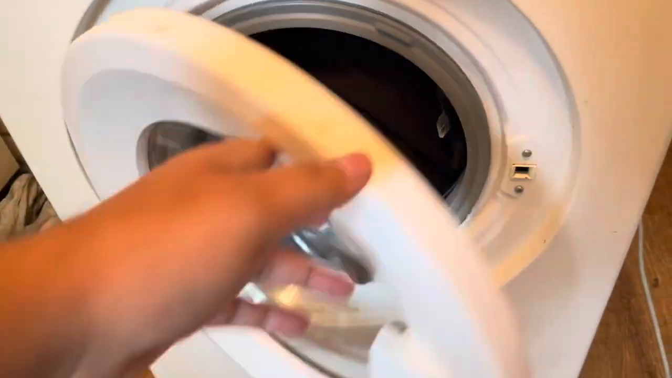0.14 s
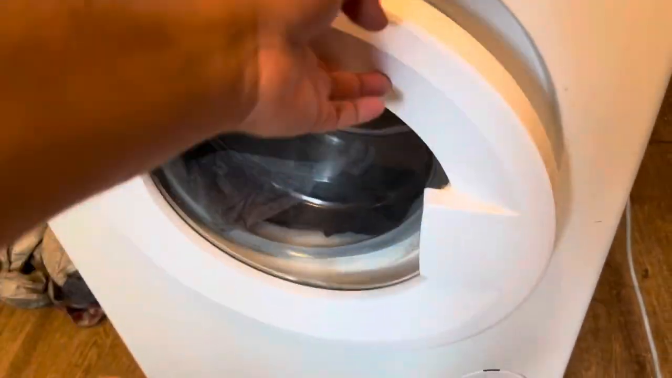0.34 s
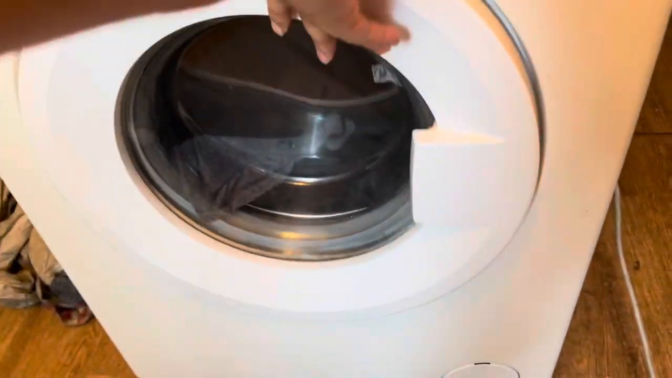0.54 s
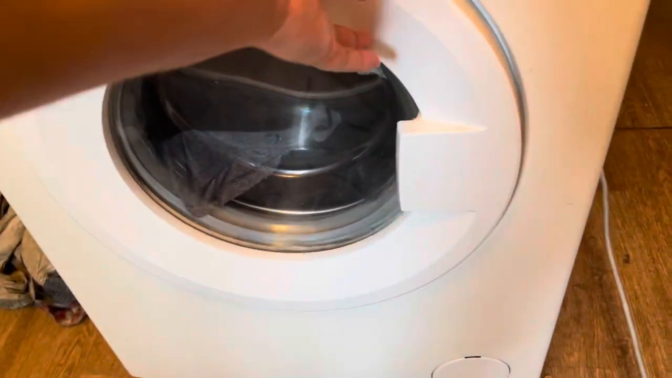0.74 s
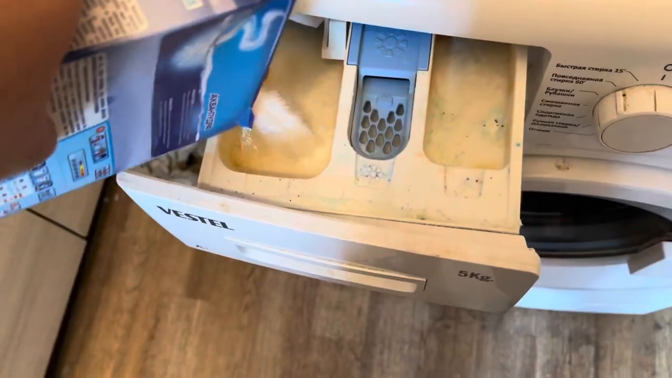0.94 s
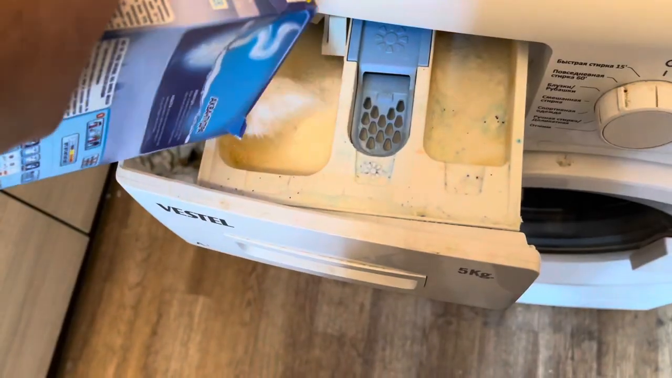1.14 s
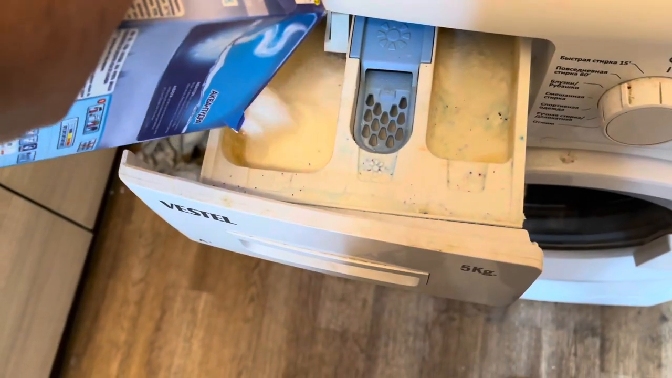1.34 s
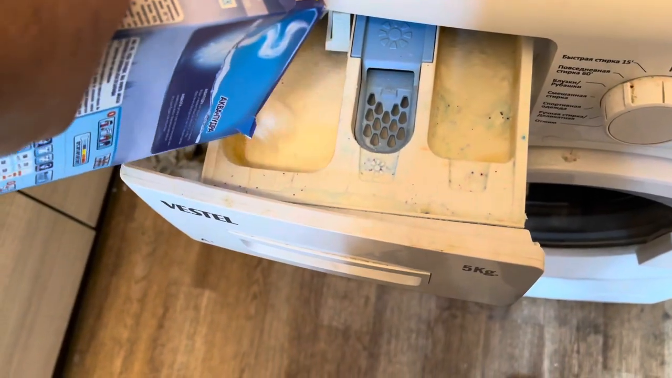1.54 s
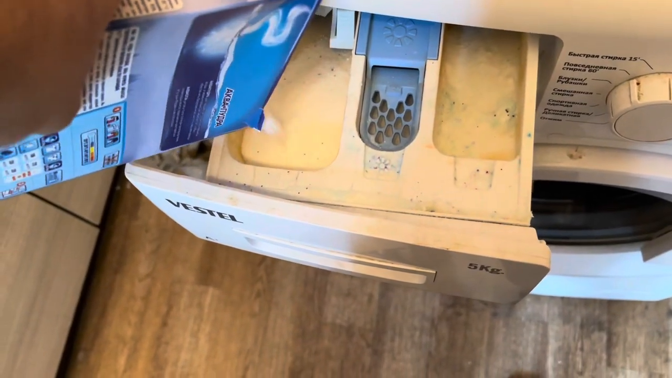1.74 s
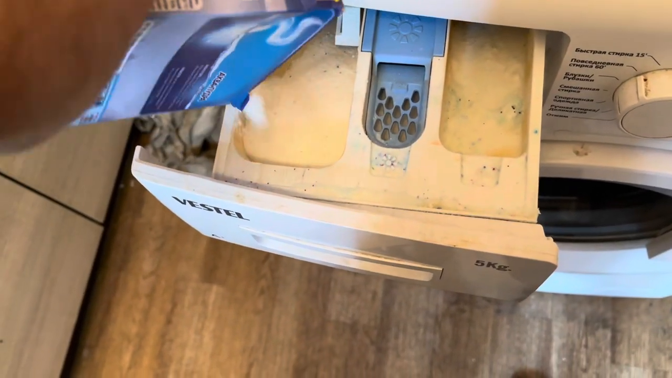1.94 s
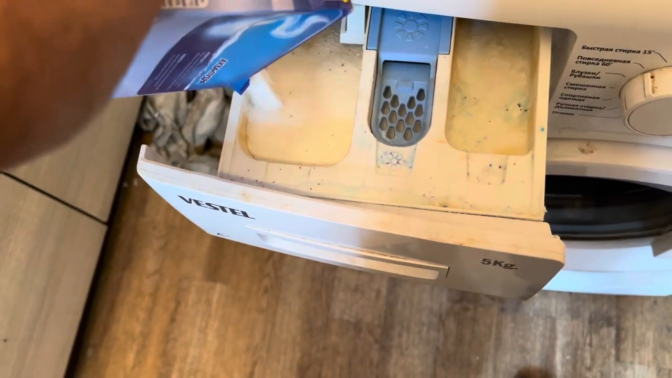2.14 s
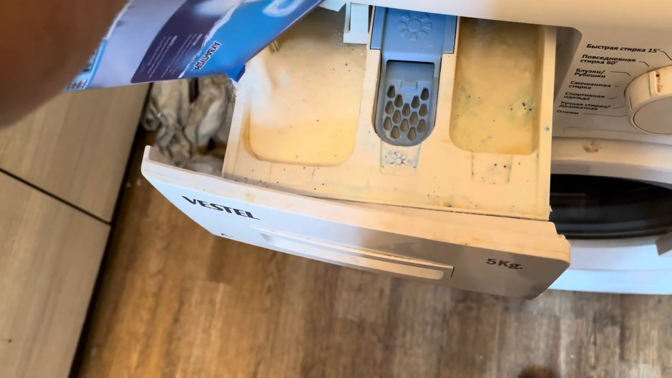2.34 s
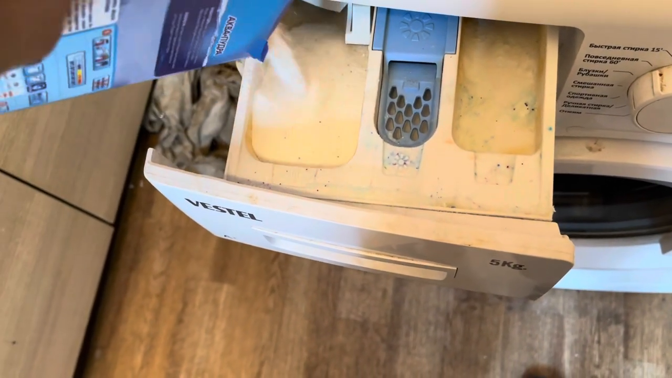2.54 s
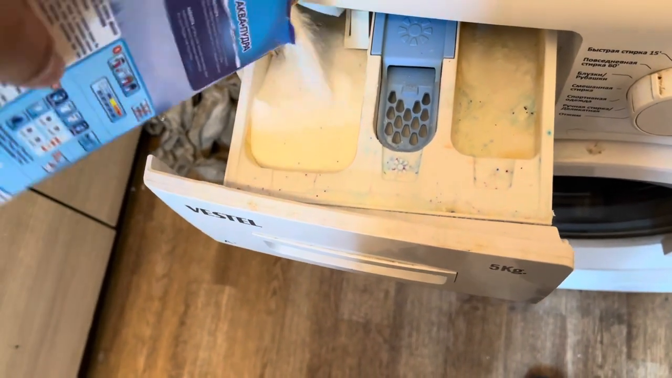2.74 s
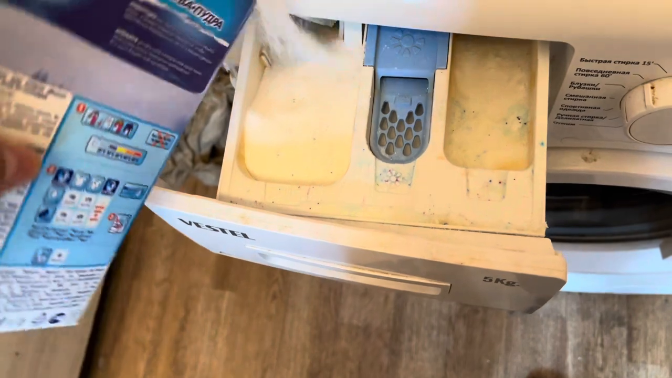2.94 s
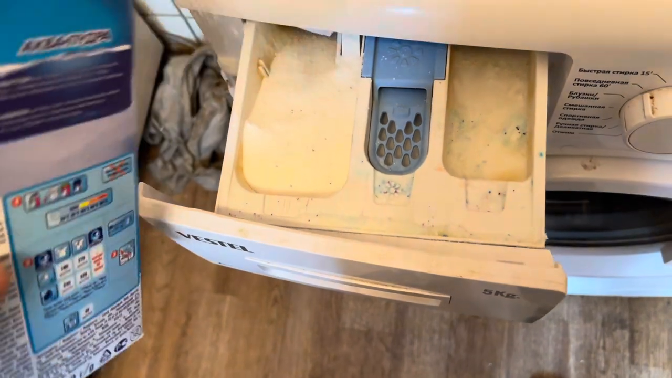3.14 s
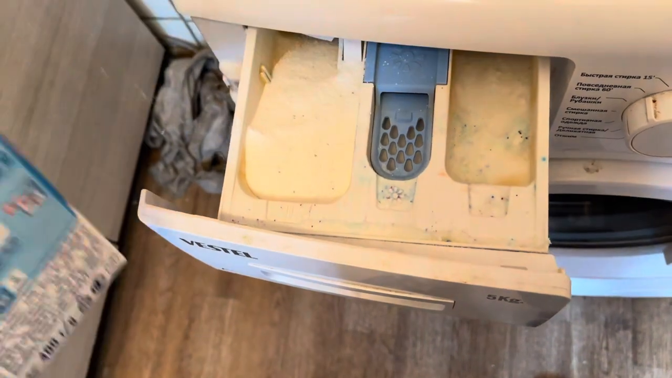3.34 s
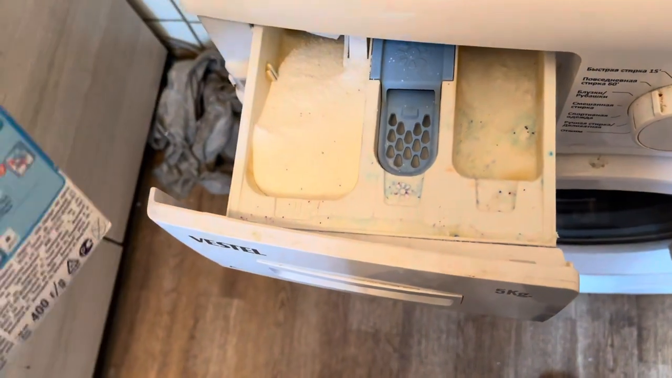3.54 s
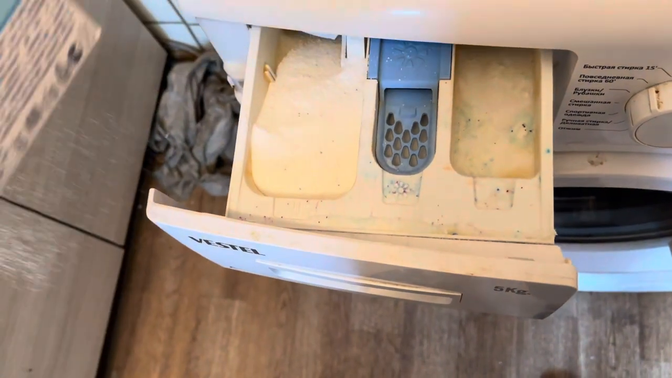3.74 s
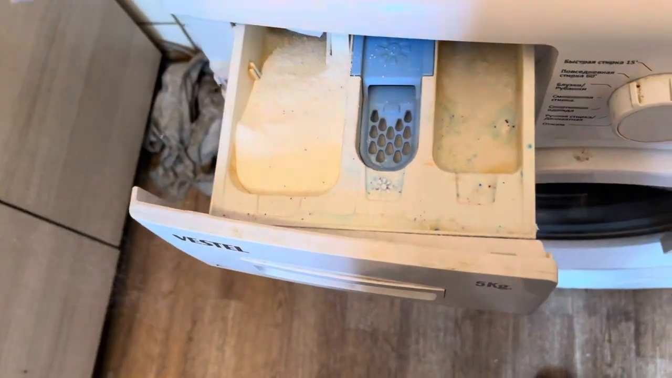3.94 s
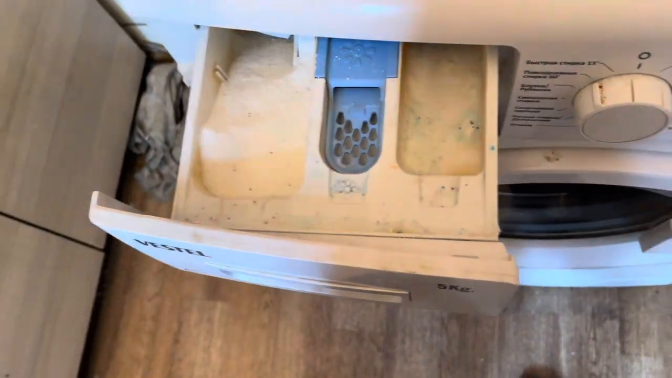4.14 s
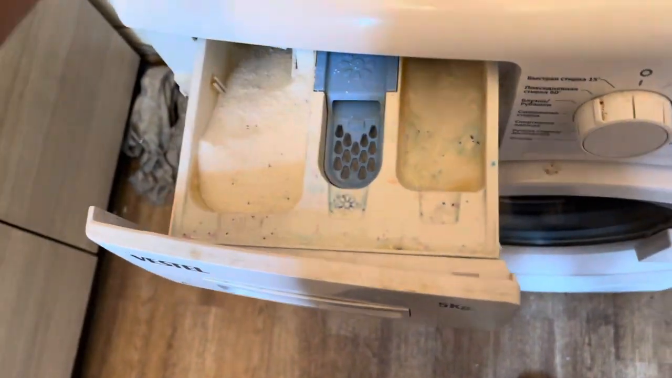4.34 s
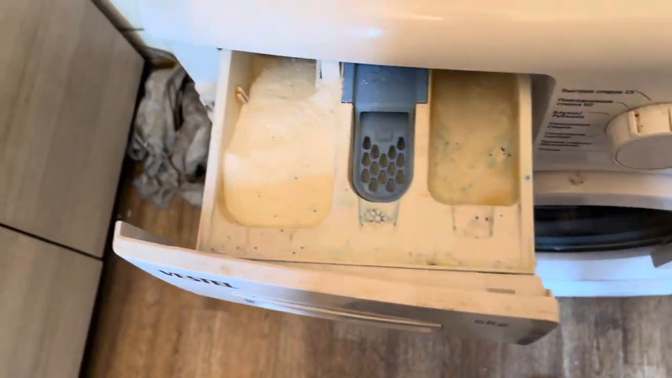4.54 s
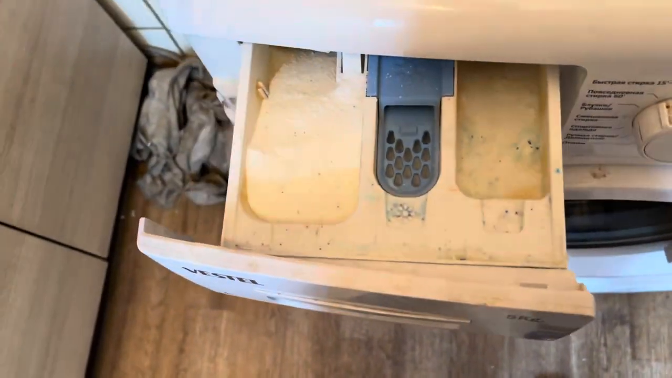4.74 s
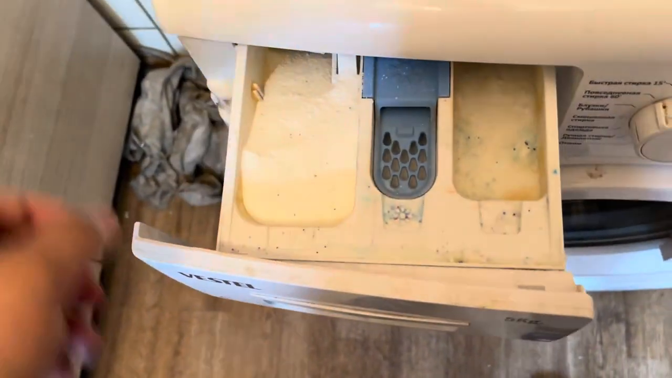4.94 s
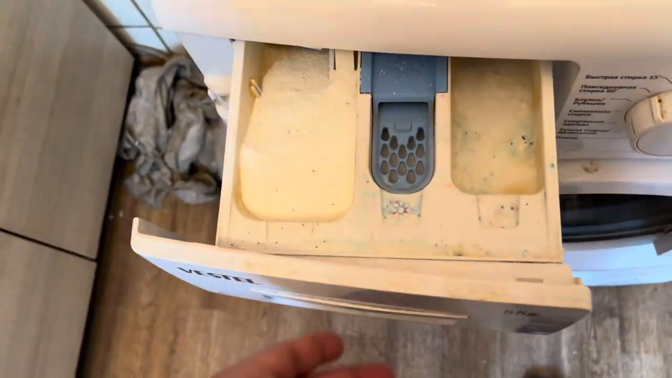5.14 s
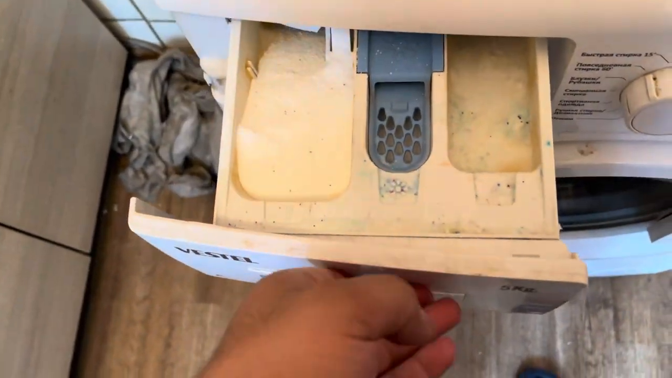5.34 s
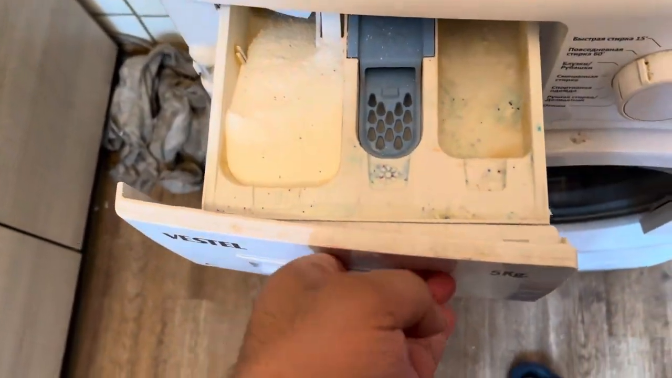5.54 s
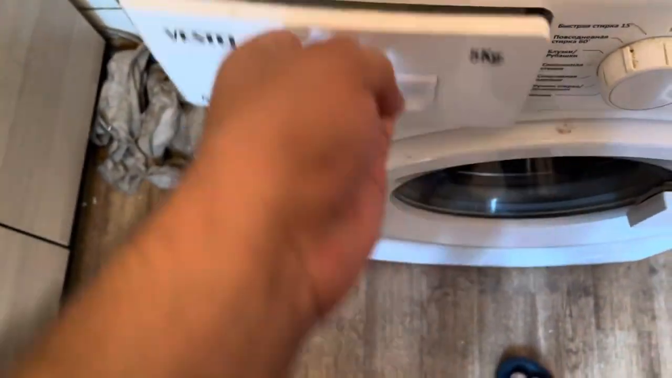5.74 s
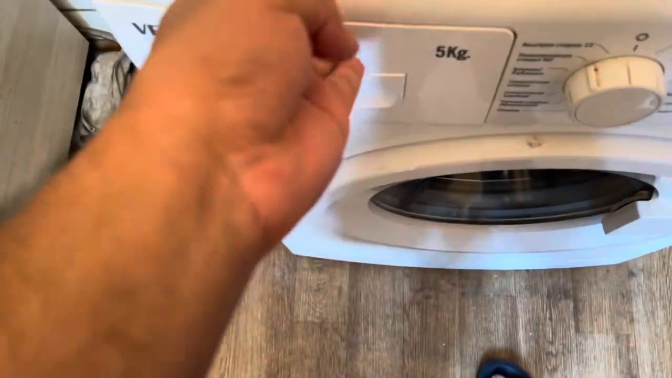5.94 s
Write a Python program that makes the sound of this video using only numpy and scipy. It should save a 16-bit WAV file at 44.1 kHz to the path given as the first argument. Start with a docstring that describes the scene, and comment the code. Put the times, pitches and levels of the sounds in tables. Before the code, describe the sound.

A washing machine door thuds shut and latches, powder pours softly, then a plastic drawer scrapes in and knocks closed.

```python
"""A small hard laundry room. A washing machine door swings shut, booms through the steel cabinet and latches.
Then, from a new spot, powder pours from a carton in a stream of tiny grains, feet shuffle, the carton is
set down, fingers tap the drawer, and it scrapes in by stick and slip and knocks home. Each knock is a
crack of noise plus the ringing modes of the thing struck. A hand-held phone with two microphone ports
hears it all over a low room tone. Quick fades mark two cuts, one between the scenes and one at the end."""
import sys
import numpy as np
from scipy import signal
from scipy.fft import rfft, irfft, next_fast_len
from scipy.io import wavfile
from scipy.ndimage import uniform_filter1d

SR = 44100
rng = np.random.default_rng(int(sys.argv[2]) if len(sys.argv) > 2 else 0)


def output_pcm(signal):
    """Save a mono or channel-first signal as 16-bit PCM at the path in sys.argv[1].

    Samples are clipped to [-1, 1] before scaling.
    """
    pcm = np.clip(np.atleast_2d(signal).T, -1, 1) * 32767
    wavfile.write(sys.argv[1], SR, np.round(pcm).astype(np.int16))


N = 268569
T = np.arange(N) / SR
FFT_SIZE = next_fast_len(N + SR)
FREQS = np.arange(FFT_SIZE // 2 + 1) * SR / FFT_SIZE

# modes of the powder drawer: (frequency [Hz], level [dB], t60 [s])
DRAWER_MODES = [(92.4, -13.5, 0.254), (153, -10, 0.1), (343, -3, 0.071), (393, -3.5, 0.017),
                (446, 0.5, 0.038), (518, -1.5, 0.038), (656, -6.5, 0.06), (780, -4.5, 0.07),
                (967, -8, 0.044), (1210, 0, 0.036), (1515, -6, 0.028), (1763, -13, 0.074), (2360, 0, 0.024),
                (2730, -3, 0.013)]
# fades at the cuts, the first between the two scenes: (time [s], fade out [s], fade in [s])
CUT_FADES = [(.812, 0.027, 0.043), (6.039, 0.031, 0.096)]


def door_slam():
    """The door lands in a quick cluster of blows that boom through the steel cabinet."""
    # (time [s], ring [dB], contact [ms], favoured pitch [Hz], crack [dB], crack centre [Hz])
    blows = [(.491, -17.5, 2.46, 840, -24, 2958), (.5145, -11, 1.45, 1400, -9.5, 1277),
             (.519, -3.5, 4.5, 544, -18, 3990), (.522, -6.5, 5.4, 148, -13, 7500),
             (.525, -22, 2, 750, -13.5, 600), (.5285, -20.5, 4, 230, -19.5, 1998)]
    # (frequency [Hz], level [dB], t60 [s])
    cabinet_modes = [(77.8, -8, 0.19), (107, -16, 0.2), (161.7, 0, .27), (171, -9.5, 0.41),
                     (247.5, -9, 0.22), (350, -9, 0.1), (457.2, -9, 0.1), (622, -7, 0.063),
                     (813, -5.5, .05), (898, -5.5, 0.072), (1130, -13, 0.036), (1600, -10.5, 0.16),
                     (2330, -20, .08)]
    return struck(blows, cabinet_modes, crack_rise_ms=1.5, crack_t60=.09)


def door_latch():
    """The latch catches in four small, bright clicks."""
    # (time [s], ring [dB], contact [ms], favoured pitch [Hz], crack [dB], crack centre [Hz])
    blows = [(.610, -19, 0.35, 3780, -14, 1996), (.614, -23, 0.06, 6000, -13, 7056),
             (.622, -26, 1.5, 3770, -31, 3800), (.631, -20, 1.1, 3750, -27, 3820)]
    # (frequency [Hz], level [dB], t60 [s])
    modes = [(1880, -10, .05), (2300, -10, .04), (3000, -10, .04), (3640, -6, .04), (3820, -6, .035),
             (4250, -8, .05), (5970, -4, .04), (8250, -8, .04)]
    return struck(blows, modes, crack_rise_ms=2.9, crack_t60=.1)


def drawer_knocks():
    """The drawer bumps along its runners and knocks home."""
    # (time [s], ring [dB], contact [ms], favoured pitch [Hz], crack [dB], crack centre [Hz])
    blows = [(5.606, -31.5, 0.85, 1240, -28, 1760), (5.634, -29, 4.22, 390, -31.5, 2490),
             (5.673, -15, 0.97, 926, -16.5, 1060), (5.676, -15, 5.4, 330, -49, 1710),
             (5.708, -28, 1.2, 480, -42, 1200), (5.7565, -15, 1.67, 1270, -22.5, 1740),
             (5.877, -41, 0.62, 1110, -37, 3700), (5.9295, -23, 1.8, 1430, -13.5, 2500),
             (5.930, -5.5, 6.24, 516, -14, 600), (6.078, -55, 0.31, 2228, -28, 5650)]
    return struck(blows, DRAWER_MODES, crack_rise_ms=1.9, crack_t60=.042)


def drawer_slide():
    """Stick-slip clicks ring the hand-damped drawer; caked powder hisses, the hollow below booms."""
    # scrape on the runners: (time [s], level [dB])
    stroke = [(5.56, -85), (5.6, -39), (5.645, -31.5), (5.67, -35.5), (5.72, -30), (5.745, -35),
              (5.78, -30), (5.82, -44), (5.87, -61), (5.93, -41)]
    start_s, bite_s, stop_s = stroke[0][0], stroke[1][0], stroke[-1][0]
    push = ((T > start_s) & (T < stop_s)) * undb(over_time(stroke)[0])
    # loose parts rattle on after the knock
    shut_s, rattle_t60, hiss_t60 = 5.945, .263, .12
    since_shut = np.maximum(T - shut_s, 0)
    shut = np.clip((T - stop_s) / (shut_s - stop_s), 0, 1)
    scrape_env = push + shut * undb(-24.5 - 60 * since_shut / rattle_t60)
    hiss_env = push * undb(-3 - 92 * np.maximum(T - bite_s, 0))  # thins as the runners clear
    hiss_env += shut * undb(-30 - 60 * since_shut / hiss_t60)
    pole = np.exp(-1 / (.07 * SR))  # the boom lingers 70 ms behind the scrape
    boom_env = undb(-8) * signal.lfilter([1 - pole], [1, -pole], scrape_env)
    slips = crackle(per_s=4000, spread_db=2.5)
    held_modes = [(hz, db - .3 * k, .3 * t60) for k, (hz, db, t60) in enumerate(DRAWER_MODES)]
    hiss = unit(butter(rng.standard_normal(N), [4500, 11000], "bandpass"))
    boom = boom_env * unit(ring(np.gradient(slips), DRAWER_MODES[:2]))
    scrape = scrape_env * undb(2.7 * wander(70)) * unit(ring(slips, held_modes))
    return boom + scrape + hiss_env * undb(3.4 * wander(47)) * hiss


def carton_set_down():
    """The carton lands with a hollow knock of three quick contacts."""
    # (time [s], ring [dB], contact [ms], favoured pitch [Hz], crack [dB], crack centre [Hz])
    blows = [(4.277, -20.5, 0.96, 1130, -24.5, 1090), (4.279, -10.5, 1.75, 261, -29.5, 7100),
             (4.293, -11.5, 3, 265, -27, 580)]
    # (frequency [Hz], level [dB], t60 [s])
    modes = [(86, -21, 0.17), (189.6, -5, 0.068), (260, -2.5, 0.033), (317.6, -8, 0.19), (442, -10, 0.056),
             (543, -10.5, 0.067), (674.4, -10, 0.14), (927, -1, 0.19), (1160, -2.5, 0.059),
             (1420, -24, 0.072), (2180, -26.5, 0.043), (2400, -18.5, 0.0525)]
    return struck(blows, modes, crack_rise_ms=2, crack_t60=.1)


def light_taps():
    """Fingers, carton and feet touch down: a click with a bright tick, then a short rough ring."""
    # (time [s], ring [dB], ring pitch [Hz], ring t60 [s], click [dB])
    taps = [(.340, -47, 770, 0.068, -54), (.403, -42.5, 810, 0.049, -68), (.913, -40.5, 6000, 0.032, -54),
            (1.563, -54, 1340, 0.097, -53), (1.802, -47, 550, 0.068, -64.5), (2.215, -50, 1223, .04, -51.5),
            (2.877, -53, 660, 0.06, -63), (2.934, -44, 291, 0.095, -59), (3.105, -45.5, 346, 0.1, -50),
            (3.157, -51.5, 609, 0.076, -72.5), (3.244, -46.5, 303, 0.065, -47.5),
            (3.417, -46, 540, 0.22, -58), (3.592, -45, 553, 0.17, -65), (3.750, -43.5, 266, 0.085, -48.5),
            (3.95, -51.5, 588, 0.092, -70), (4.111, -38, 589, 0.19, -45.5), (4.230, -44, 590, 0.047, -70),
            (4.253, -36.5, 249, 0.11, -60), (4.561, -52.5, 2495, 0.032, -70), (4.55, -50.5, 550, 0.25, -75),
            (4.608, -51.5, 556.6, 0.12, -75), (5.197, -43, 825, 0.063, -41.5),
            (5.368, -43, 382.8, 0.07, -47.5), (5.460, -32, 305, 0.047, -38),
            (5.546, -44, 1290, 0.027, -50.5), (5.571, -40, 438, 0.087, -45)]
    out = np.zeros(N)
    for s, ring_db, hz, t60, click_db in taps:
        add(out, s + .003, undb(ring_db) * burst(hz, t60, width=.58, rise_ms=3.6))
        add(out, s, undb(click_db) * burst(hz=1200, t60=.03, width=.9, rise_ms=1.5))
        add(out, s, undb(click_db - 4) * burst(hz=4000, t60=.03, width=2.2, rise_ms=1))
    return out


def footsteps():
    """Soft thumps through the floor, each sagging in pitch as it dies."""
    # (time [s], level [dB], final pitch [Hz], extra pitch at the start [share])
    steps = [(.345, -37.5, 92.5, .1), (2.778, -50.5, 65, 0.19), (2.829, -44.5, 70, 0.18),
             (2.88, -45, 62.1, 0.37), (2.944, -45.5, 61.5, 0.2), (3.173, -43, 59.5, 0.13),
             (3.418, -38.5, 68.4, 1.07), (3.467, -37, 52, 0.15), (3.591, -39.5, 65, 1.74),
             (5.412, -48, 108, 0.054)]
    out = np.zeros(N)
    decay = fade(t60=.1423)
    env = decay * np.minimum(T[:len(decay)] / .008, 1)
    for s, db, hz, sag in steps:
        cycles = np.cumsum(hz * (1 + sag * decay)) / SR
        add(out, s, undb(db) * env * np.sin(2 * np.pi * cycles))
    return out


def powder_and_rustle():
    """Dense grains: a long pour of powder, and rustles of card and cloth that rise, hold and die."""
    # powder leaving the carton: (time [s], level [dB])
    flow = [(.8, -53), (.9, -52), (1.25, -50.5), (1.5, -52), (1.65, -57.5), (1.9, -61.5), (2.22, -58),
            (2.4, -63.5), (2.7, -73)]
    # (start [s], rise [s], hold [s], level [dB], dull part against bright [dB])
    rustles = [(-.1, 0.11, .03, -62, -1.5), (.05, .2, 0.1, -62, 7.5), (1.99, 0.18, 0.027, -60, 11),
               (2.75, 0.17, .02, -66, -3), (3.089, .02, 0.21, -69, -1), (3.406, 0.15, 0.026, -48, -5),
               (3.5, 0.11, 0.29, -59, -5), (4.107, 0.018, .04, -67, 12), (4.157, 0.14, 0.13, -54.5, 5),
               (5.174, 0.029, .02, -62, -8), (5.256, 0.13, 0.34, -76, 2)]
    # (frequency [Hz], level [dB])
    grain_spectrum = [(500, -9.5), (1200, 2.5), (1900, -4.5), (2500, -1), (2900, -6), (4000, -6.5),
                      (6500, -2.5), (10500, 1), (12000, -11.5), (14000, -38)]
    rise_db, fall_db_per_s, pour_dull_db = 15, 109.5, -3.5
    pour = undb(over_time(flow)[0]) * (T > flow[0][0])
    pour *= undb(-fall_db_per_s * np.maximum(T - flow[-1][0], 0))
    bright_power, dull_power = pour ** 2, (pour * undb(pour_dull_db)) ** 2
    for s, rise, hold, db, dull_db in rustles:
        rising = rise_db * np.maximum(s + rise - T, 0) / rise
        falling = fall_db_per_s * np.maximum(T - s - rise - hold, 0)
        bright_power += undb(db - rising - falling) ** 2
        dull_power += undb(db + dull_db - rising - falling) ** 2
    grains = unit(colour(crackle(per_s=6000, spread_db=.59), eq_curve(grain_spectrum)))
    dull = signal.lfilter(*signal.butter(1, 3000, fs=SR), grains)
    flicker = undb(.8 * wander(25) + 1.2 * wander(7))
    return flicker * (np.sqrt(dull_power) * dull + np.sqrt(bright_power) * (grains - dull))


def room_tone():
    """Wavering rumble under a steadier murmur of the house, swelling as someone moves near the phone."""
    # (time [s], rumble [dB], murmur [dB])
    swells = [(0, -67, -63.5), (.3, -53, -61.5), (.45, -60.5, -56), (.8, -68.5, -65), (1.5, -67.5, -64),
              (2.7, -64, -62.5), (3.3, -58.5, -61), (3.7, -66.5, -61.5), (4.2, -56.5, -55.5),
              (4.55, -63.5, -60), (4.9, -72.5, -65.5), (5.2, -69, -61.5), (5.5, -59, -58.5),
              (6.09, -57.5, -46)]
    # (frequency [Hz], level [dB])
    rumble_spectrum = [(15, -37.5), (25, -5), (59, 5.5), (134, -8.5), (167, 0), (195, -8.5), (250, -11.5),
                       (320, -39), (550, -120)]
    # (frequency [Hz], level [dB])
    murmur_spectrum = [(100, -32), (165, -8), (210, -14), (300, -11.5), (450, -10.5), (530, -10),
                       (660, -6.5), (800, -12.5), (1100, -18), (1500, -28.5), (2030, -31.5), (11000, -40),
                       (12500, -78)]
    rumble_db, murmur_db = over_time(swells)
    rumble = unit(colour(rng.standard_normal(N), eq_curve(rumble_spectrum) * (FREQS < 260)))
    murmur = unit(colour(rng.standard_normal(N), eq_curve(murmur_spectrum)))
    return undb(rumble_db + 3 * wander(16)) * rumble + undb(murmur_db + 2 * wander(25)) * murmur


def room_reverb(x):
    """Hard walls add a short tail: octave bands of noise, each dying at its own rate."""
    # (frequency [Hz], t60 [s])
    decay_times = [(60, 0.63), (250, 0.44), (1000, 0.42), (4000, 0.46), (11000, 0.19)]
    decay_hz, decay_s = np.transpose(decay_times)
    tail, noise = np.zeros(N), rng.standard_normal(SR)
    for hz in 62.5 * 2. ** np.arange(8):
        t60 = np.interp(np.log(hz), np.log(decay_hz), decay_s)
        top_hz = hz * 2 ** .5 * (1.6 if hz > 7000 else 1)
        band = butter(noise, [hz / 2 ** .5, top_hz], "bandpass")
        add(tail, .004, band[:int(t60 * SR)] * fade(t60))
    return x + undb(-8) * colour(x, response(tail))


def mic_ports(x, image):
    """Left and right differ by a phase lead and by sound scattered off the hand and walls."""
    hz, lead, alike = np.transpose(image)
    lead, alike = np.interp(FREQS, hz, lead), np.interp(FREQS, hz, alike)
    scatter = rng.standard_normal(SR // 4) * fade(.25)
    stray = np.sqrt((1 - alike) / 2) * response(scatter)
    common = np.sqrt((1 + alike) / 2)
    left = (common + stray) * np.exp(.5j * lead)
    right = (common - stray) * np.exp(-.5j * lead)
    return colour(x, np.array([left, right]))


def struck(blows, modes, crack_rise_ms, crack_t60):
    """The place and length of each contact favour some modes; the contact itself cracks."""
    force, crack = np.zeros(N), np.zeros(N)
    for s, ring_db, contact_ms, favoured_hz, crack_db, crack_hz in blows:
        push = np.hanning(int(contact_ms * SR / 1000) + 3)
        swing = np.sin(2 * np.pi * favoured_hz * T[:len(push)])
        add(force, s, undb(ring_db) * 2 * push / push.sum() * swing)
        t60 = crack_t60 * (1000 / crack_hz) ** .3  # crack_t60 holds at 1 kHz; lower cracks linger
        add(crack, s, undb(crack_db) * burst(crack_hz, t60, width=1.95, rise_ms=crack_rise_ms))
    return ring(force, modes) + crack


def ring(force, modes):
    """Damped modes set going by a force; neighbours swing in opposite senses."""
    out = np.zeros(N)
    for k, (hz, db, t60) in enumerate(modes):
        pole = np.exp(2j * np.pi * hz / SR - np.log(1000) / (t60 * SR))
        out += (-1) ** k * undb(db) * signal.lfilter([1], [1, -pole], force).imag
    return out


def burst(hz, t60, width, rise_ms):
    """A puff of noise around hz, 0.2 s at most; filtered twice for steep skirts."""
    b, a = signal.iirpeak(hz, 1 / width, SR)
    noise = unit(signal.lfilter(b, a, signal.lfilter(b, a, rng.standard_normal(SR // 4))))
    env = fade(min(t60, .2))
    return noise[:len(env)] * env * np.minimum(T[:len(env)] * 1000 / rise_ms, 1)


def crackle(per_s, spread_db):
    """Randomly timed clicks of uneven size."""
    clicks = (rng.random(N) < per_s / SR) * rng.standard_normal(N)
    return clicks * undb(spread_db * rng.exponential(size=N))


def wander(rate):
    """Random levels held 1 / rate s and smoothed twice; spread near 1."""
    hold = int(SR / rate)
    levels = np.repeat(rng.standard_normal(N // hold + 1), hold)
    return 1.3 * uniform_filter1d(uniform_filter1d(levels, hold), hold)[:N]


def fade(t60):
    """Decay of 60 dB in t60 seconds."""
    return np.exp(-np.log(1000) * T[:int(t60 * SR)] / t60)


def eq_curve(table):
    """Gain at every frequency from (Hz, dB) points joined on a log axis."""
    hz, db = np.transpose(table)
    return undb(np.interp(np.log(FREQS + 1), np.log(hz + 1), db))


def over_time(table):
    times, *columns = np.transpose(table)
    return [np.interp(T, times, column) for column in columns]


def response(tail):
    return rfft(tail / np.sqrt(np.sum(tail ** 2)), FFT_SIZE)


def colour(x, gain):
    return irfft(rfft(x, FFT_SIZE) * gain, FFT_SIZE)[..., :N]


def butter(x, hz, kind):
    return signal.sosfilt(signal.butter(2, hz, kind, fs=SR, output="sos"), x)


def add(out, s, x):
    i = int(s * SR)
    out[i:i + len(x)] += x[:len(out) - i]


def undb(db):
    return 10 ** (np.asarray(db) / 20)


def unit(x):
    return x / np.sqrt(np.mean(x ** 2))


def scene():
    """First at the door, then at the drawer, each spot with its own stereo image."""
    # the ports at the door: (frequency [Hz], left lead [rad], likeness [share])
    door_image = [(0, 0, 1), (300, .1, .9), (700, .7, .6), (1300, 1.5, .5), (2000, 0, .4), (4500, .6, .7),
                  (7500, 1.2, .6), (8700, 0, .98), (10200, -3.14, .97), (11900, -6.28, .9),
                  (13600, -9.4, .8)]
    # the ports at the drawer: (frequency [Hz], left lead [rad], likeness [share])
    drawer_image = [(0, 0, 1), (500, 0, .93), (900, -.1, .8), (1700, 0, .97), (2400, 1.4, .75),
                    (2900, 2.4, .4), (3300, 2.2, .3), (4000, 2.2, .3), (4600, 2.5, .6), (4850, 3.14, .95),
                    (5300, 4.5, .7), (5900, 6.28, 1), (6600, 6.8, .87), (8300, 8.8, .9), (8700, 9.35, 1),
                    (9400, 9.5, 1), (10000, 10.2, .92), (11400, 11.9, .8), (11900, 12.56, 1),
                    (22050, 12.56, 1)]
    door = room_reverb(door_slam() + door_latch())
    chores = room_reverb(carton_set_down() + drawer_knocks() + drawer_slide() + light_taps() + footsteps())
    at_door = T < CUT_FADES[0][0]
    bodies = butter(chores + at_door * door, 50, "highpass")  # the struck bodies are cut below 50 Hz
    mix = bodies + powder_and_rustle() + room_tone()
    return np.where(at_door, mic_ports(mix, door_image), mic_ports(mix, drawer_image))


def record(dry):
    """Quick fades out and back in at the cuts, then the phone's colour, soft overload and top cut."""
    # (frequency [Hz], gain [dB])
    mic_response = [(20, -24.5), (45, 1.5), (70, 4), (1500, 0.5), (2600, 3), (5000, 0), (8500, 2),
                    (10800, 3.5), (11800, -6), (13000, -19.5), (14500, -36)]
    ceiling, top_hz = .97, 15700
    gain = np.ones(N)
    for s, out_s, in_s in CUT_FADES:
        gain *= np.interp(T, [s - out_s, s, s + in_s], [1, .05, 1])
    coloured = colour(dry * gain, eq_curve(mic_response))
    rounded = ceiling * np.tanh(coloured / ceiling)
    return signal.sosfilt(signal.ellip(8, .2, 70, top_hz, fs=SR, output="sos"), rounded)


dry = scene()
out = record(dry)
output_pcm(out)
```